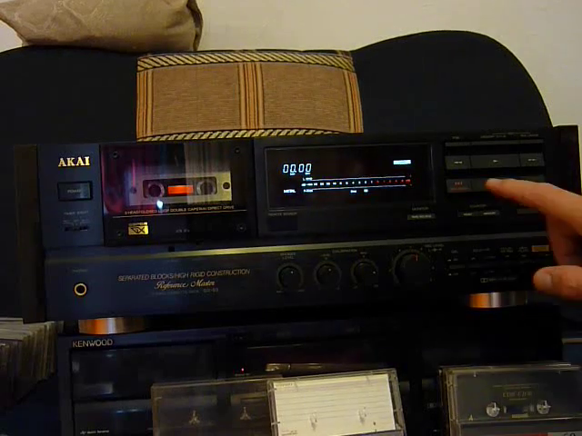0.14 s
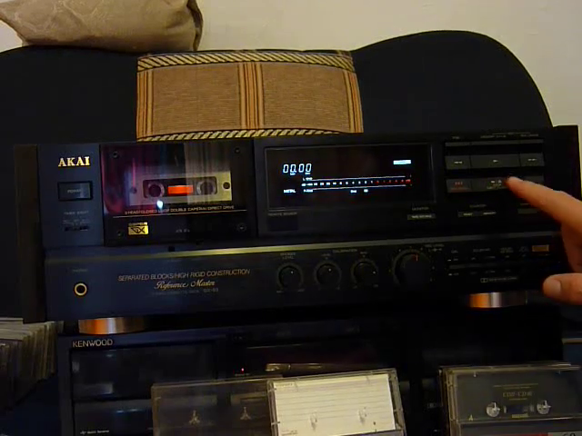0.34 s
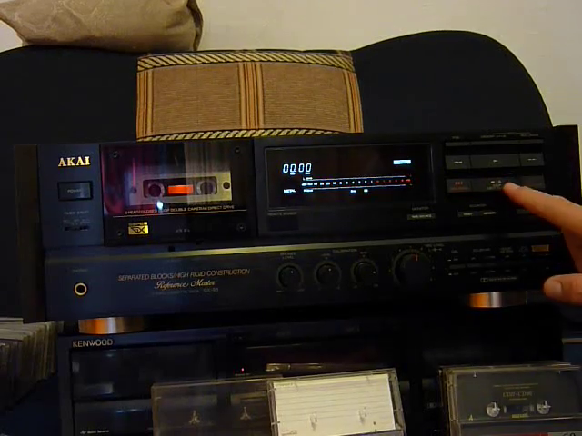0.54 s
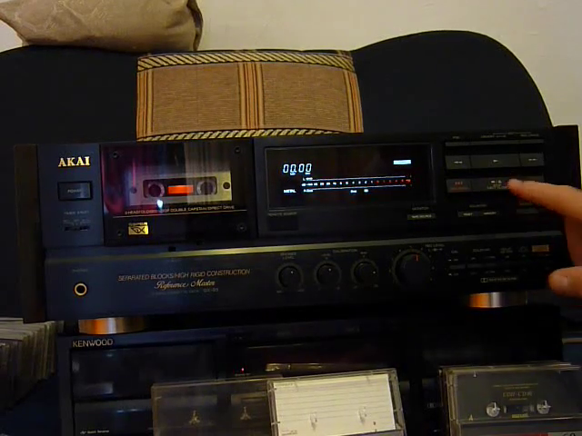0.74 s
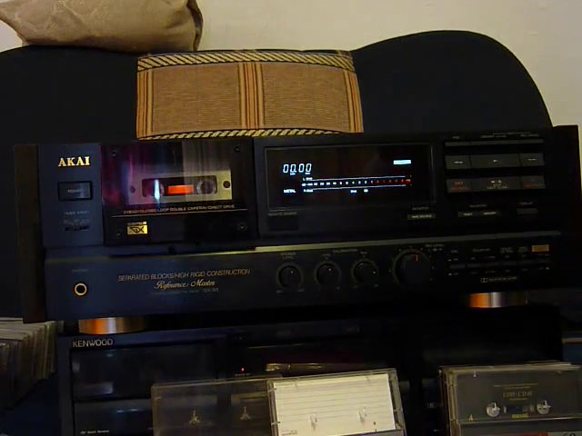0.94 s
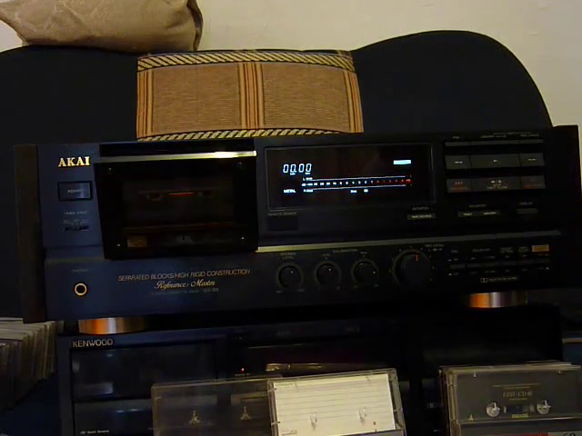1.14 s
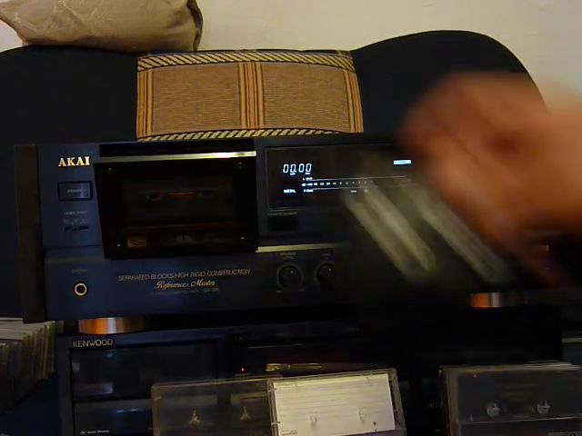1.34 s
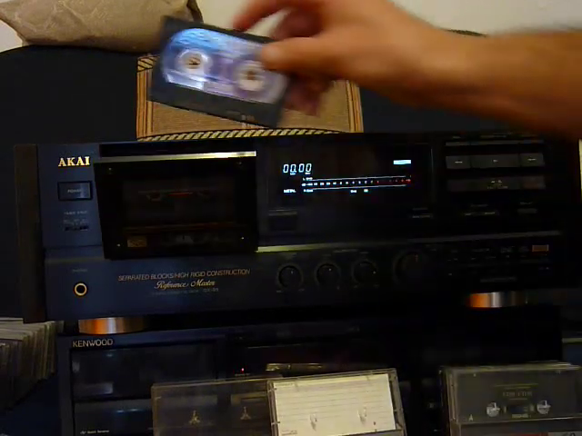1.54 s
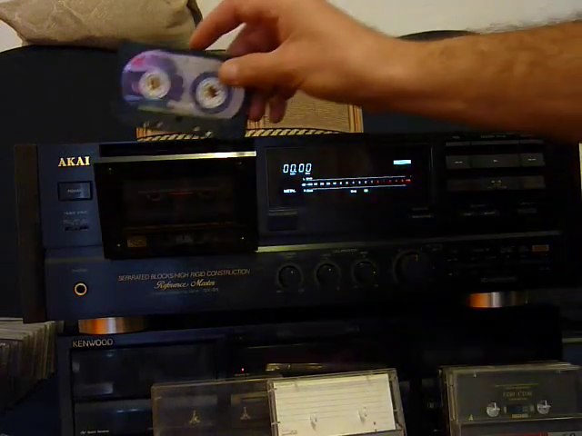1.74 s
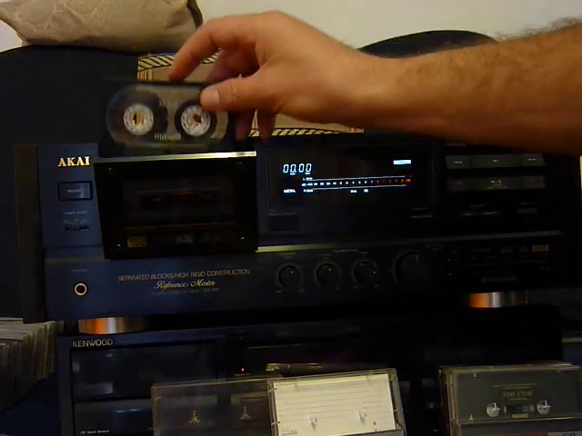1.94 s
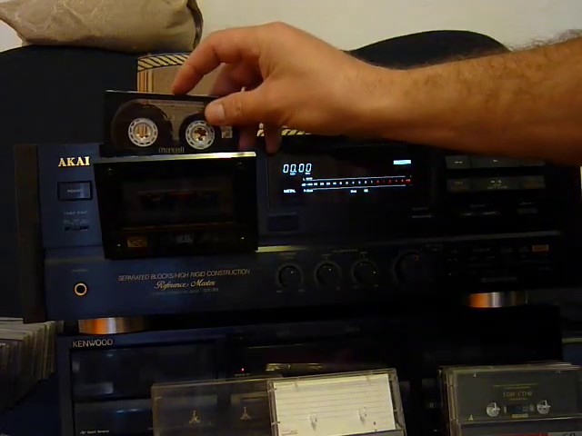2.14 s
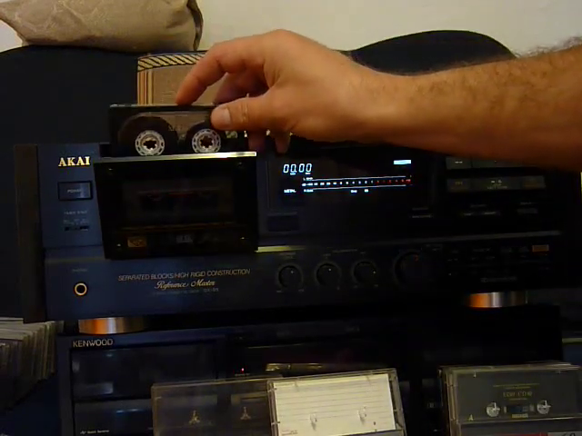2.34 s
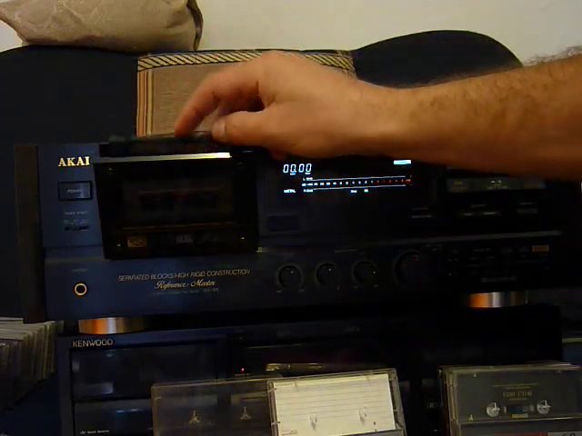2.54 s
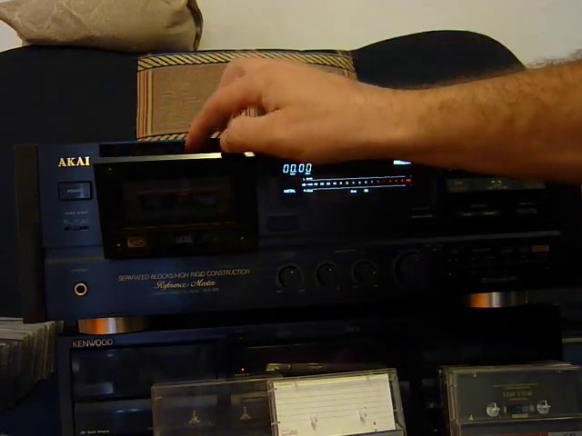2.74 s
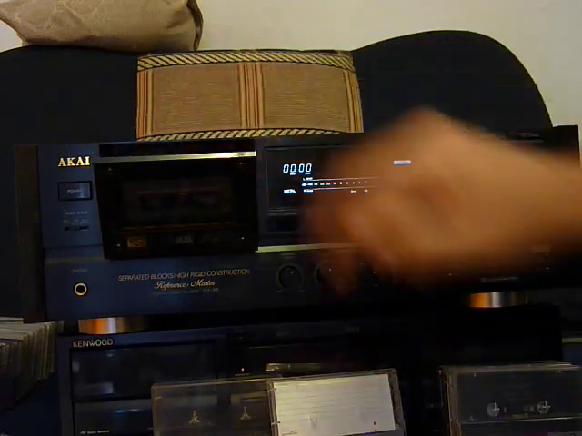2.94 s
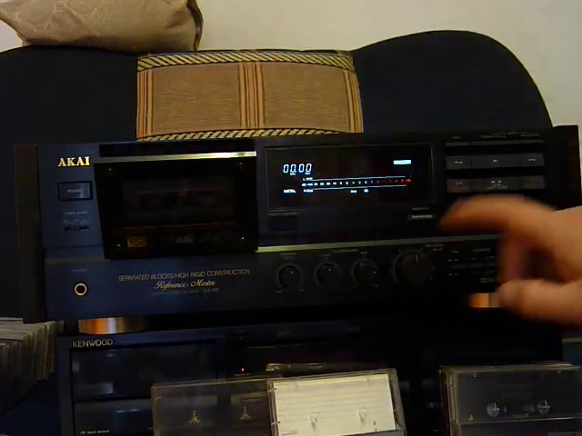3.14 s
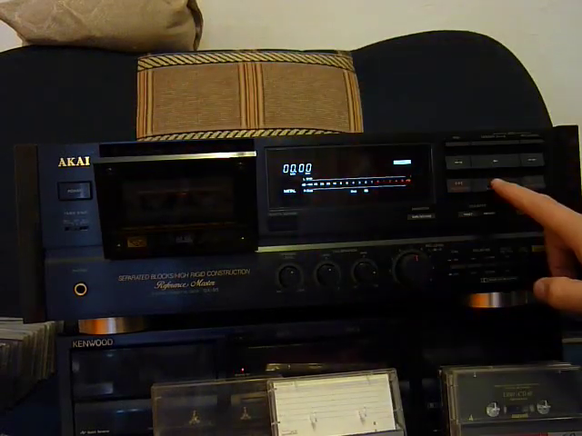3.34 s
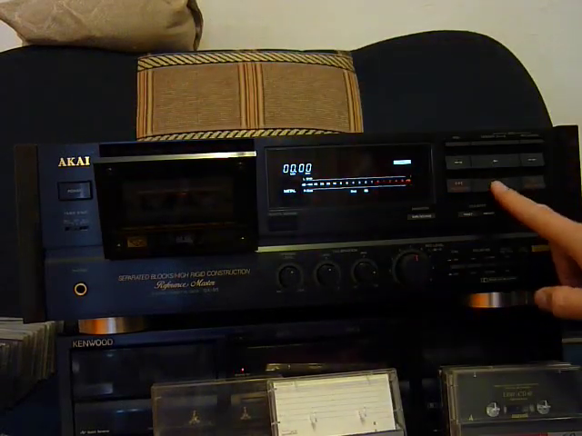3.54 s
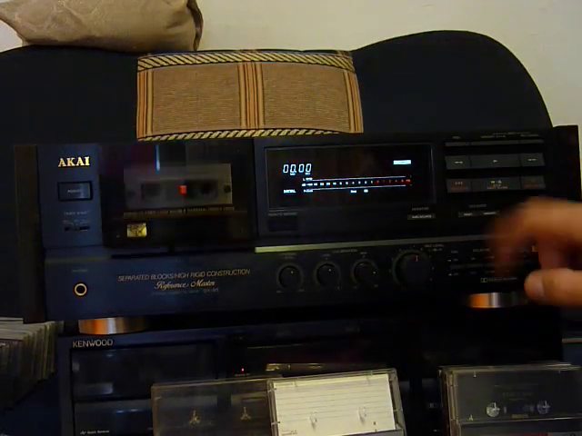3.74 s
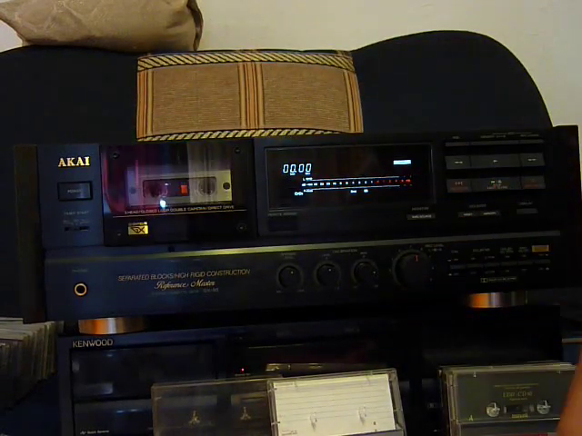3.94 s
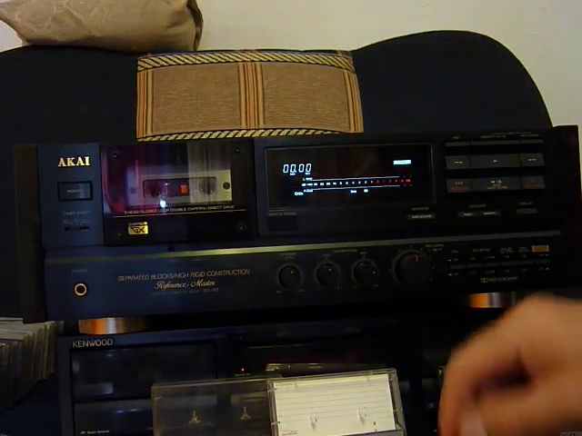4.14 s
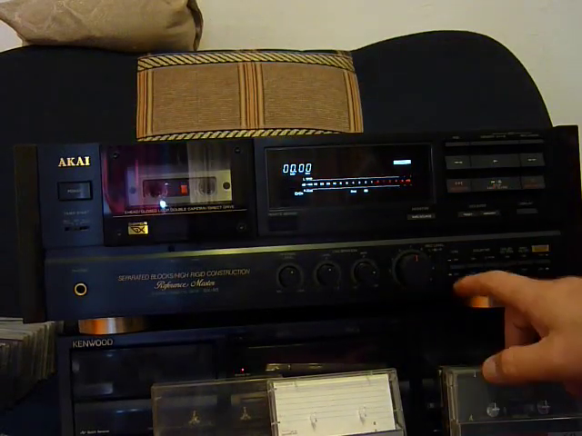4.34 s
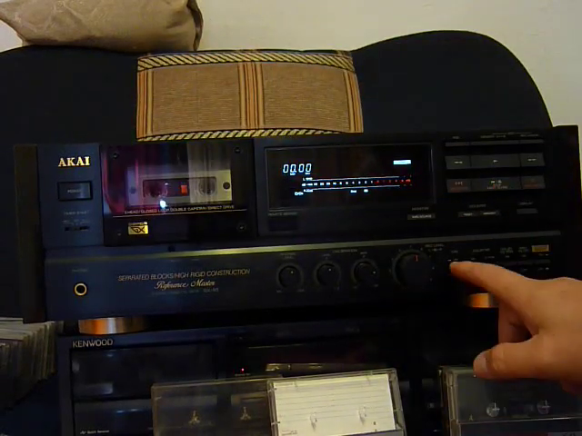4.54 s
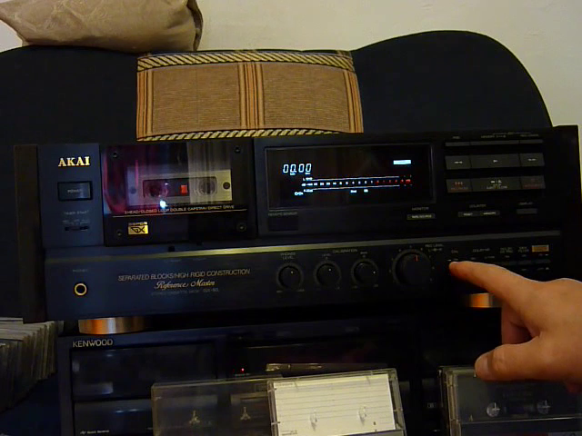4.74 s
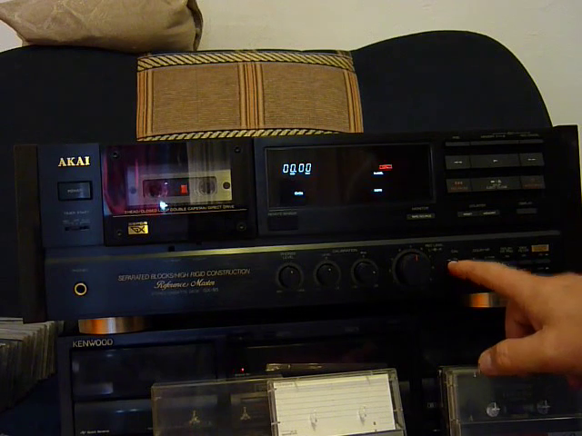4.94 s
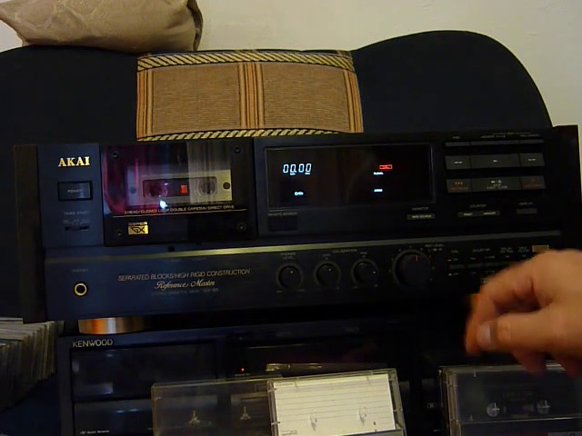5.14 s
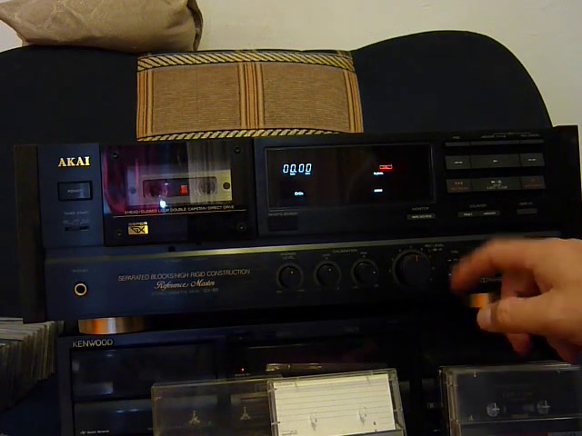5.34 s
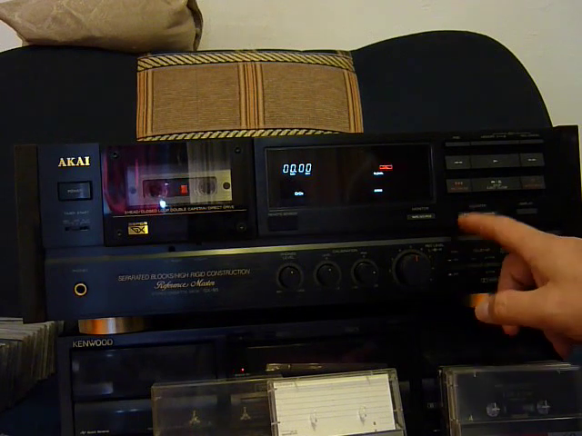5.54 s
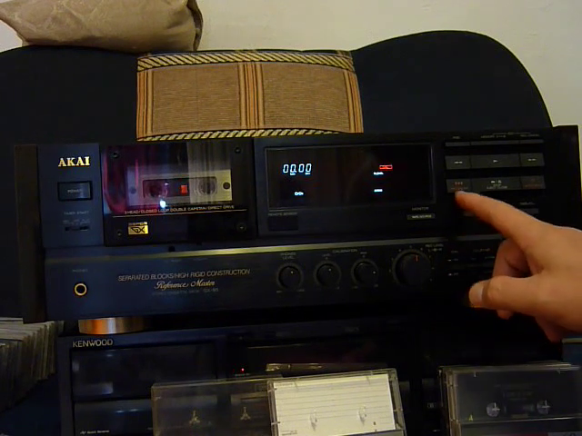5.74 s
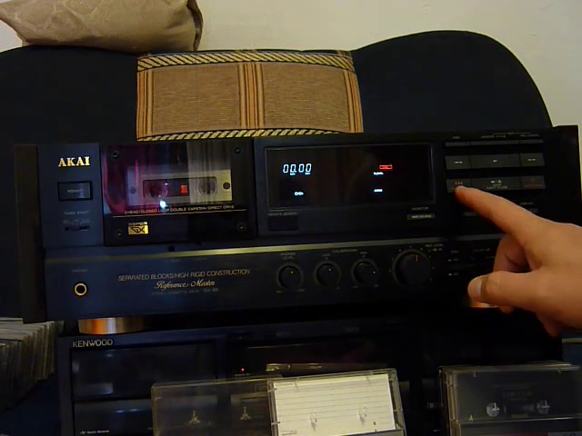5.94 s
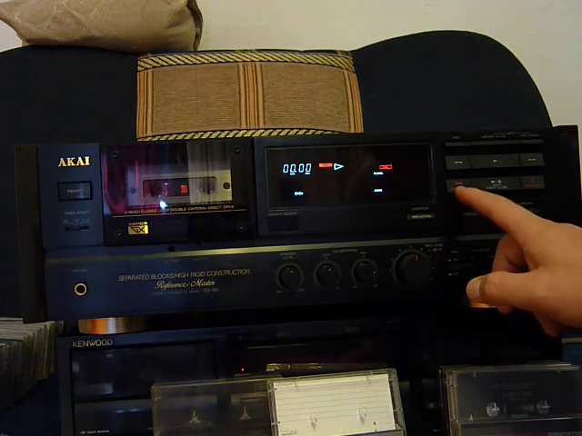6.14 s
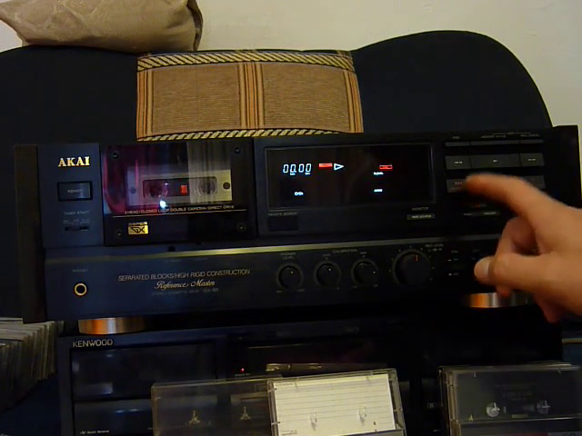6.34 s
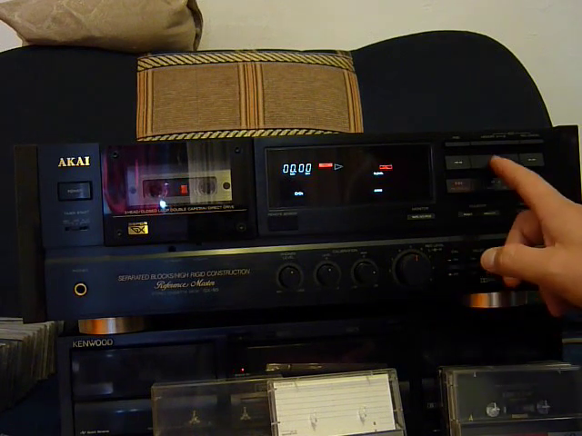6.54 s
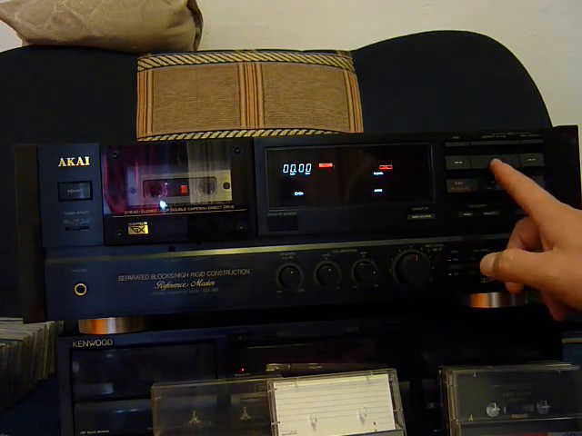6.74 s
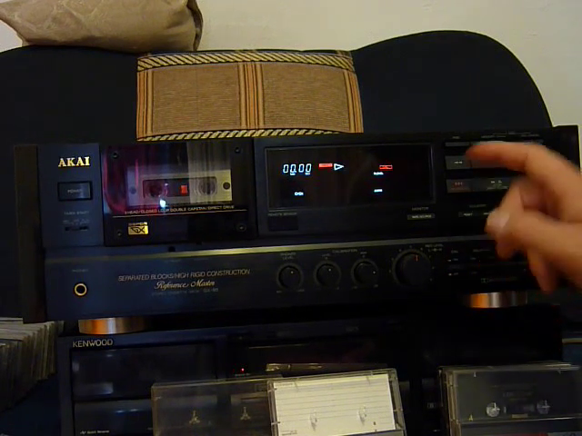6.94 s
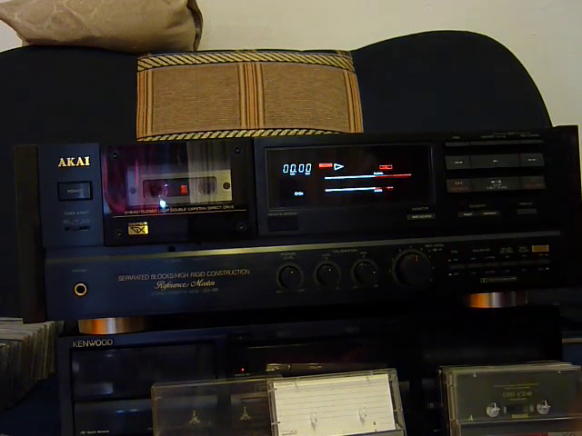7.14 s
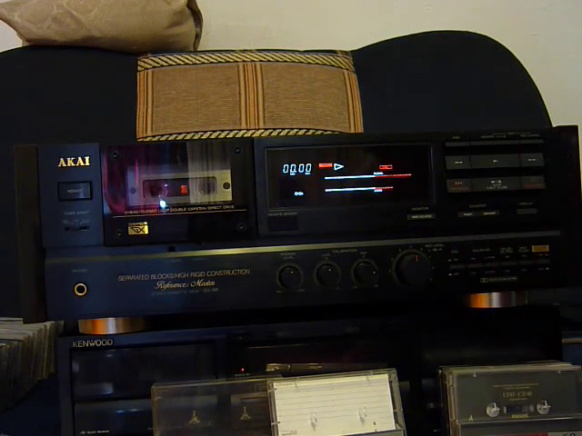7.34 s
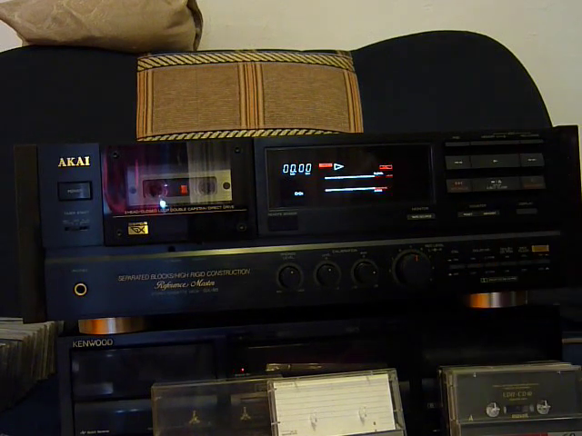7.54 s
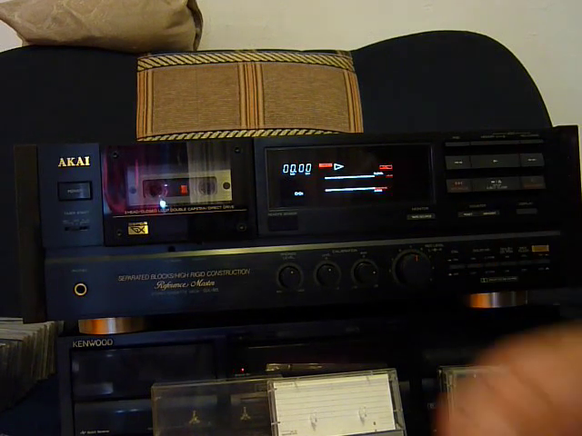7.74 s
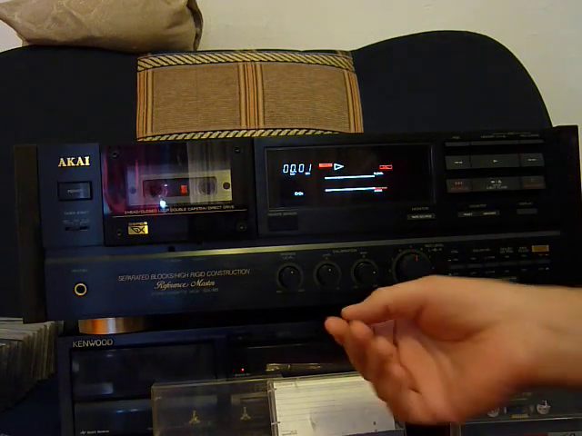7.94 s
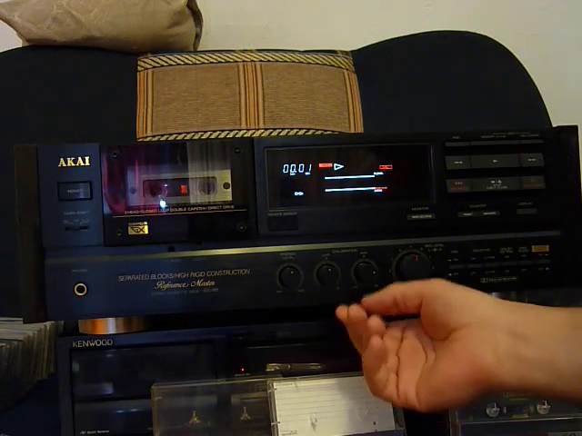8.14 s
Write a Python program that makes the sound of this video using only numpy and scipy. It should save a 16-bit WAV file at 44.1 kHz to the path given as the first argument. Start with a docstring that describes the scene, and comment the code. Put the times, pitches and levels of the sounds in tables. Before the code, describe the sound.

Close clicks and clacks of a cassette deck: door opens, tape is swapped, door shuts with a short motor whirr, buttons snap, over steady hiss.

```python
"""A small furnished room, with a cassette deck heard close by through a small, hissy microphone.
Buttons are pressed, the motor opens the door, a cassette drops into the holder, the door shuts and the
transport engages. Contacts set the latches, housing and chassis ringing; moving parts shake the chassis,
rattle the gears and rub; a motor whirrs. Echoes are decaying noise; coloured hiss and faint hum lie under all."""
import sys
import numpy as np
from scipy import signal
from scipy.fft import rfft, irfft, next_fast_len
from scipy.io import wavfile
from scipy.ndimage import uniform_filter1d

SR = 44100
rng = np.random.default_rng(int(sys.argv[2]) if len(sys.argv) > 2 else 0)


def generate_wav(signal):
    """Clip the signal to [-1, 1] and save it as 16-bit WAV at the path in sys.argv[1]."""
    frames = np.transpose(np.atleast_2d(signal))
    scaled = np.clip(frames, -1, 1) * 32767
    pcm = np.round(scaled).astype(np.int16)
    wavfile.write(sys.argv[1], SR, pcm)


N = 361751  # samples, 8.2 s

# Hiss of the microphone and room. Each row: frequency in Hz, relative level per Hz in dB.
HISS_COLOUR = [(26, -55), (45, -22.5), (91, -6.5), (114, -5), (149, -10.5), (214, -2), (262, -6), (287, -2),
               (322, -8.5), (352, -5.5), (541, -7.5), (850, -6), (952, -12.5), (6800, -22), (9990, -34.5),
               (13000, -87), (22000, -120)]
# Wavering tones of the room hum. Each row: frequency in Hz, width in Hz, level in dB before evening out.
HUM_TONES = [(36, 3.9, -71), (119.6, 11.4, -61.5), (210.2, 8, -59.5), (292.6, 6.6, -58), (670, 14, -64),
             (779, 4.1, -61.5), (837, 3.9, -60), (1001, 8.8, -67), (1164, 15, -68), (2897, 51, -71.5)]
# Chassis on its shelf, its modes. Each row: frequency in Hz, relative level in dB, 60 dB decay time in seconds.
CHASSIS_MODES = [(180, -5, 0.11), (211.8, 0.5, 0.18), (281, 4, 0.053), (395.6, -10, 0.19)]
# Rattling gears, their bands. Each row: frequency in Hz, width in Hz, relative level in dB.
GEAR_BANDS = [(503, 440, 4.5), (885, 700, 8.5), (1540, 280, -21), (2460, 350, -8)]
# Movements of parts. Each row: full effort reached in seconds, build-up in seconds, hold in seconds,
# chassis shaking in dB, gear rattle in dB, sliding in dB.
MOVEMENTS = [(.708, 0.021, .004, -42, -54, -65), (.79, 0.3, 0.05, -38.5, -46, -67),
             (1.151, 0.34, 0.06, -41, -45.5, -56), (1.57, .03, 0.0087, -68, -53.5, -71),
             (2.1, 0.19, 0.039, -46.5, -58, -68), (2.3, 0.037, 0.025, -48, -37.5, -47),
             (2.45, 0.048, 0.049, -56, -55.5, -67), (2.668, 0.066, 0.0057, -36, -38, -55),
             (3.6, 0.039, 0.13, -50, -50, -67.5), (3.93, .2, 0.058, -47.5, -51.5, -56),
             (4.17, 0.6, 0.018, -49.5, -53.5, -62.5), (6.05, 0.088, 0.058, -43.5, -69, -66),
             (6.9, .15, 0.084, -51, -51, -61), (7.15, 0.094, 0.17, -68, -62, -61)]
# Panel, door and cassette shell, their modes. Each row: frequency in Hz, relative level in dB,
# 60 dB decay time in seconds.
HOUSING_MODES = [(499, -2.5, 0.017), (631, -2, 0.043), (747, -4.5, 0.073), (970, 5.5, 0.014),
                 (1072, -1.5, 0.035), (1245, -3, 0.035), (1394, 0, 0.034), (1510, 4, 0.025),
                 (1693, -1.5, 0.031), (1814, 1.5, 0.02), (2163, -0.5, 0.021), (2190, -6.5, 0.052),
                 (2534, 0.5, 0.028)]
# Small latches and levers, their modes. Each row: frequency in Hz, relative level in dB,
# 60 dB decay time in seconds.
LATCH_MODES = [(2740, -3.5, 0.0076), (3243, 5, 0.0052), (4000, -7, 0.012), (4340, -9, 0.025),
               (4780, 5, 0.0033), (5710, 3.5, 0.0048), (6150, -6, 0.017), (6650, 0, 0.0079),
               (7540, 5.5, 0.0028), (7280, -5, 0.0036), (7830, -4.5, 0.004), (10550, 8, 0.0097)]
# Touches of plastic and metal parts: stop button, heads lowered and door opened (0.6 to 1.3 s); cassette
# lifted out, another slid in and dropped (1.4 to 2.7 s); button, door shut and transport engaged
# (3.5 to 4.4 s); small buttons, then record and play (from 4.8 s).
# Each row: time in seconds, crack peak in dB, housing level in dB relative to the crack, favoured housing
# pitch in Hz, favoured crack pitch in Hz, scrape before the blow in ms, chatter after it in ms.
TOUCHES = [ (.615, -24, -2.5, 1050, 7300, .9, 6.4), (.692, -30.5, -10, 864, 5590, 0.76, 4.1),
           (.727, -31, -7, 2200, 3030, .7, 9), (.742, -30.5, -3, 2300, 7000, 5, 6.2),
           (.752, -30, 1.5, 2100, 4090, 5.8, 8), (.765, -35, -1, 2100, 3000, 5, 7),
           (0.779, -31, -11, 1800, 8000, 3, 7), (0.8328, -33, -7, 1000, 4700, 5, 5.8),
           (.8746, -30, -7, 810, 7000, .7, 3.8), (1.036, -32, -6, 1020, 6550, 0.69, 2.4),
           (1.058, -49.5, 12, 1450, 3000, 2.1, 3), (1.0801, -28.5, 5.5, 1290, 3300, 3.9, 4.8),
           (1.105, -28.5, -3, 1310, 6940, .6, 3.3), (1.1596, -7, -5.5, 1660, 5840, 0.47, 2.2),
           (1.272, -20.5, -10.5, 1220, 6400, 0.49, 3.4), (1.4316, -44, 12, 1390, 2880, 1.5, 2),
           (1.5112, -33.5, 7, 1210, 5940, 0.38, 5.9), (1.551, -40.5, -1, 1400, 6000, 2.1, 2.6),
           (2.0059, -19.5, -12, 1025, 5450, 2, 3.5), (2.05, -33, -5, 899, 3200, .9, 2.8),
           (2.0794, -26, -8.5, 845, 3530, 0.42, 11), (2.0904, -22, -7.5, 1070, 4400, 7.3, 7),
           (2.127, -34, -6.5, 764, 5800, 2.1, 2.6), (2.2857, -9, -16, 1400, 6160, 2.6, 7.9),
           (2.296, -23.5, 3.5, 1310, 6810, 4.2, 6.6), (2.345, -14.5, -5, 1170, 4900, 6.4, 9.4),
           (2.487, -43, -3, 1000, 5300, 5.1, 8), (2.622, -21, -9, 1700, 4670, 0.74, 8.4),
           (2.637, -25, 2.1, 1290, 5130, 5.1, 7.4), (2.646, -23, 0, 1040, 2900, 1.2, 3),
           (2.6566, -12.5, -2, 1710, 3060, 1.4, 8.2), (2.6616, -8, -4.5, 1620, 6500, 0.64, 3.9),
           (3.5728, -23, -2.1, 1120, 7000, .6, 4.4), (3.626, -44, 3, 1060, 3180, 1.1, 3.3),
           (3.6578, -33.5, -3.5, 1260, 3230, 1.5, 6), (3.8407, -26, -23, 821, 6000, .6, 2.9),
           (3.859, -26.5, -11, 1530, 6480, 1.1, 3.8), (3.8854, -43, 18, 1140, 3300, .6, 2.3),
           (3.9053, -48, 18, 1300, 2900, .9, 2.9), (3.914, -21.5, -6.5, 1580, 5870, 0.66, 8.5),
           (3.9259, -26.5, 2.5, 1030, 2900, 7.5, 2.9), (4.015, -31, -1, 890, 6400, 2.8, 2.5),
           (4.033, -24, -12, 900, 7250, 0.64, 4.9), (4.314, -38.5, -16, 826, 7500, 1.2, 4.4),
           (4.888, -32, -12, 856, 5700, .8, 2.6), (5.0332, -27.5, -16, 1400, 4400, 0.52, 2.9),
           (6.03, -60.5, 25.5, 500, 5000, 9, 11), (6.053, -37.5, 6.5, 497, 5000, 0.71, 7.4),
           (6.059, -28, -6, 1860, 7360, 1.4, 6), (6.248, -40.5, -5, 837, 5630, 1.1, 3.6),
           (6.785, -28.5, -3.5, 1000, 6260, 0.44, 6.2), (6.905, -40, 1, 990, 7000, 4.1, 4.6),
           (6.921, -29, -3, 980, 7400, 1.9, 2.7), (6.932, -15.5, -14, 1940, 5800, 0.8, 4.7)]

HISS_DB, HUM_STEADINESS = -49, 0.69
ROOM_T60_S, ROOM_DB, ROOM_DELAY_S = 0.22, -6, 0.0073
BUILD_UP_DB = 26  # climb over one build-up time
SETTLE_DB_PER_S = (113, 146, 103.5)  # shaking, rattle, sliding
# capstan motor
WHIRR_HZ, WHIRR_WIDTH_HZ, WHIRR_DB = 2460, 790, -52
WHIRR_ON_S, WHIRR_OFF_S, WHIRR_EDGE_S, WHIRR_SAG_DB_PER_S = 3.87, 4.41, 0.03, 8.5
LEAD_S = 0.015  # room for the scrape ahead of each blow
CLACK_HZ, CLACK_LOSS_DB = 2320, 8  # front panel
MIC_EDGE_HZ, CUTOFF_HZ, OFFSET = 10200, 10150, -0.0562


def from_db(db):
    """Turn decibels into an amplitude factor."""
    return 10 ** (np.asarray(db) / 20)


def rms_one(x):
    """Scale a signal to an rms of 1."""
    return x / np.sqrt(np.mean(x ** 2) + 1e-20)


def resonance(x, hz, width_hz):
    """Two-pole band with gain of about 1 on top."""
    r = np.exp(-np.pi * width_hz / SR)
    feedback = [1, -2 * r * np.cos(2 * np.pi * hz / SR), r * r]
    return signal.lfilter([(1 - r * r) / 2, 0, (r * r - 1) / 2], feedback, x)


def ring(drive, hz, t60):
    """A unit click sets a decaying sine of starting height 1 ringing."""
    r = from_db(-60 / (t60 * SR))
    w = 2 * np.pi * hz / SR
    return signal.lfilter([0, np.sin(w)], [1, -2 * r * np.cos(w), r * r], drive + 1e-18)


def background():
    """Smooth coloured hiss with a few narrow hum tones that waver, as narrow bands of noise do."""
    size = next_fast_len(N)
    bin_hz = np.arange(1, size // 2 + 2) * SR / size
    knots_hz, knots_db = np.transpose(HISS_COLOUR)
    colour = from_db(np.interp(np.log(bin_hz), np.log(knots_hz), knots_db))
    hiss = irfft(rfft(rng.standard_normal(size)) * colour, size)[:N]

    white = rng.standard_normal(N)
    tones = np.array([rms_one(resonance(resonance(white, hz, width), hz, width))
                      for hz, width, _ in HUM_TONES])
    # long swells are evened out
    tones /= (uniform_filter1d(tones ** 2, size=4000) + 0.14) ** (HUM_STEADINESS / 2)
    hum = from_db(np.array(HUM_TONES)[:, -1]) @ tones
    return from_db(HISS_DB) * rms_one(hiss) + hum


def room(x):
    """Dense reflections: noise that dies away, starting after the first bounce."""
    age = np.arange(int(0.5 * SR)) / SR
    decay = from_db(-60 * age / ROOM_T60_S) * (age > ROOM_DELAY_S)
    tail = rng.standard_normal(len(age)) * decay
    return signal.fftconvolve(x, tail / np.sqrt(np.sum(tail ** 2)))[:N]


def swell(start, end, build_up, fall_db_per_s):
    """Level in dB: climbs to 0 at the start, holds to the end, then falls away."""
    t = np.arange(N) / SR
    climb = -BUILD_UP_DB * np.clip(start - t, 0, None) / build_up
    return climb - fall_db_per_s * np.clip(t - end, 0, None)


def effort():
    """Gains of shaking, rattle and sliding: each movement builds up, holds and settles."""
    settle = np.reshape(SETTLE_DB_PER_S, (-1, 1))
    return sum(from_db(np.reshape(db, (-1, 1)) + swell(s, s + held, build_up, settle))
               for s, build_up, held, *db in MOVEMENTS)


def chassis_shaking():
    """A noisy push rings the chassis modes; dividing by the running level keeps the force even."""
    push = rng.standard_normal(N)
    shake = sum(from_db(db) * ring(push, hz, t60) for hz, db, t60 in CHASSIS_MODES)
    band = signal.butter(2, [140, 450], "band", fs=SR, output="sos")
    shake = signal.sosfilt(band, shake)
    shake /= np.sqrt(uniform_filter1d(shake ** 2, size=2600) + 1e-9)
    return rms_one(shake)


def motor_whirr(teeth):
    """Random tooth clicks through one narrow doubled band; the level sags until the motor stops."""
    whirr = resonance(resonance(teeth, WHIRR_HZ, WHIRR_WIDTH_HZ), WHIRR_HZ, WHIRR_WIDTH_HZ)
    run_db = swell(WHIRR_ON_S, WHIRR_ON_S, WHIRR_EDGE_S, WHIRR_SAG_DB_PER_S)
    stop_db = swell(0, WHIRR_OFF_S, 1, BUILD_UP_DB / WHIRR_EDGE_S)
    return from_db(WHIRR_DB + run_db + stop_db) * rms_one(whirr)


def loading(teeth_per_s):
    """Moving parts shake the chassis; random tooth clicks make gear rattle, grainy rubbing and whirr."""
    shake_gain, rattle_gain, rub_gain = effort()
    teeth = (rng.random((3, N)) < teeth_per_s / SR) * rng.standard_normal((3, N))
    rattle = sum(from_db(db) * resonance(teeth[0], hz, width) for hz, width, db in GEAR_BANDS)
    rub = resonance(teeth[1], 5800, 3000)
    moving = rattle_gain * rms_one(rattle) + rub_gain * rms_one(rub)
    return shake_gain * chassis_shaking(), moving + motor_whirr(teeth[2])


def strike(modes, peak_db, favoured_hz, reach_octaves, scatter_db, softness, focus_db):
    """Each contact is a scrape, a blow and a brief chatter; where it lands favours modes near one pitch."""
    touches = np.array(TOUCHES)
    s, scrape_ms, chatter_ms = touches[:, 0], touches[:, -2:-1], touches[:, -1:]
    hz, mode_db, t60 = np.transpose(modes)[:, :, None]
    age = np.arange(int(0.2 * SR)) / SR
    rings = from_db(mode_db - 60 * age / t60) * np.sin(2 * np.pi * hz * age)
    rings[1::2] *= -1  # neighbouring modes in opposite sense leave no holes between them

    away = np.log2(hz.T / np.reshape(favoured_hz, (-1, 1))) / reach_octaves
    luck = rng.standard_normal((len(s), len(modes)))
    strength = from_db(scatter_db * luck - focus_db * away ** 4 / (1 + away ** 4))

    since_ms = 1000 * (age - LEAD_S)
    fade_ms = np.clip(np.where(since_ms < 0, scrape_ms, chatter_ms), 0.1, 12)
    shape = np.exp(-np.abs(since_ms) / fade_ms)
    force = softness * rng.standard_normal((len(s), len(age))) * shape
    force[:, round(LEAD_S * SR)] = 1  # the blow
    # level the spectrum so brief touches push all pitches evenly
    spectrum = rfft(force)
    force = irfft(spectrum / np.abs(spectrum), len(age)) * np.sqrt(shape)

    sounds = signal.fftconvolve(strength @ rings, force, axes=1)
    sounds *= from_db(peak_db)[:, None] / np.max(np.abs(sounds), axis=1, keepdims=True)
    starts = np.round((s - LEAD_S) * SR).astype(int)
    out = np.zeros(N)
    np.add.at(out, starts[:, None] + np.arange(sounds.shape[1]), sounds)
    return out


def contacts():
    """Latches crack, the housing knocks, the front panel clacks and the chassis thumps at every contact."""
    _, crack_db, housing_db, low_hz, high_hz, _, _ = np.transpose(TOUCHES)
    knock_db = crack_db + housing_db
    clack_db = crack_db + np.minimum(housing_db, 0) - CLACK_LOSS_DB
    crack = strike(LATCH_MODES, crack_db, high_hz,
                   reach_octaves=0.36, scatter_db=3.0, softness=0.4, focus_db=6)
    knock = strike(HOUSING_MODES, knock_db, low_hz,
                   reach_octaves=0.3, scatter_db=4.0, softness=0.19, focus_db=14.5)
    # the knock passes on into the chassis, weaker
    thump = strike(CHASSIS_MODES, knock_db - 19, 230,
                   reach_octaves=1.5, scatter_db=3, softness=0.05, focus_db=0)
    clack = strike(HOUSING_MODES, clack_db, CLACK_HZ,
                   reach_octaves=0.25, scatter_db=7.5, softness=0.31, focus_db=10)
    return crack + knock + clack + thump


def scene():
    """The deck in its room; the capsule rolls off the top and its port leaves one dip in the treble."""
    shaking, moving = loading(teeth_per_s=2500)
    deck = contacts() + moving
    # the shaking arrives through the furniture, without echoes
    heard = deck + from_db(ROOM_DB) * room(deck) + shaking
    capsule = signal.butter(6, MIC_EDGE_HZ, fs=SR, output="sos")
    heard = signal.sosfilt(capsule, heard) + background()
    port_dip = 0.5 * resonance(heard, hz=8150, width_hz=1070)
    return (heard - port_dip)[None]


def record(dry):
    """The top is cut steeply and the converter sits off centre by a constant offset."""
    top_cut = signal.cheby2(8, 40, CUTOFF_HZ, fs=SR, output="sos")
    return signal.sosfilt(top_cut, dry) + OFFSET


dry = scene()
out = record(dry)
generate_wav(out)
```